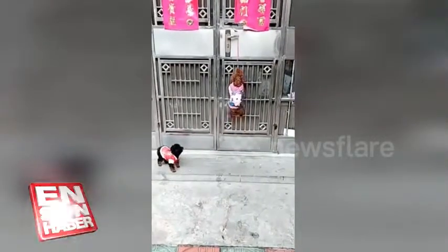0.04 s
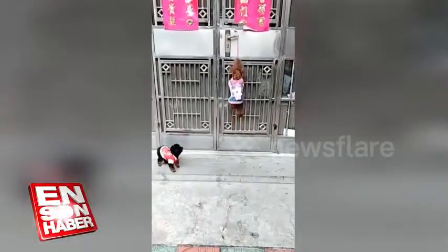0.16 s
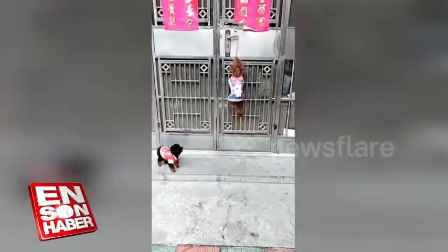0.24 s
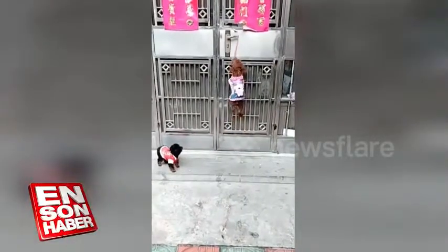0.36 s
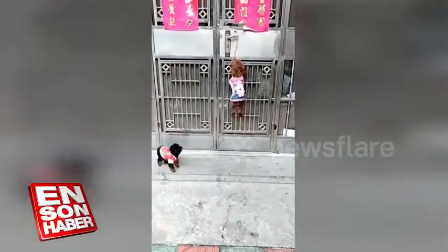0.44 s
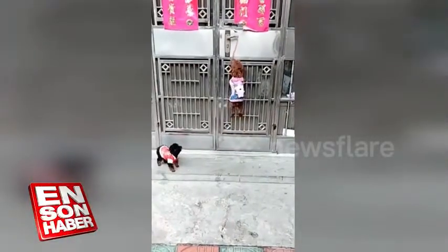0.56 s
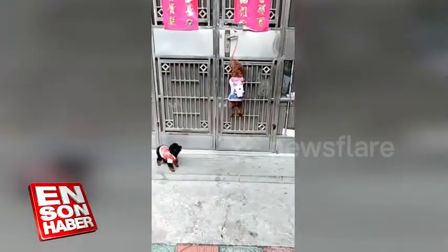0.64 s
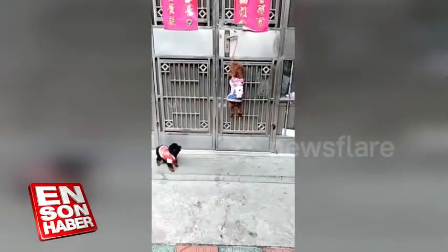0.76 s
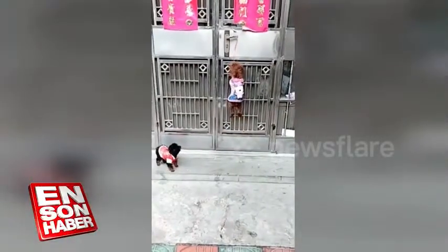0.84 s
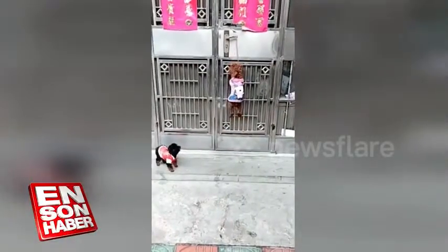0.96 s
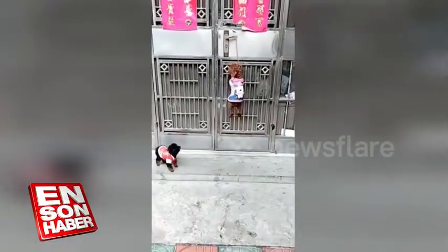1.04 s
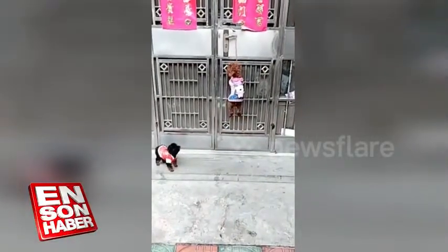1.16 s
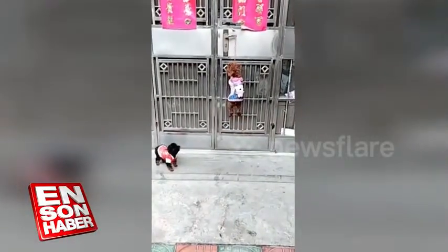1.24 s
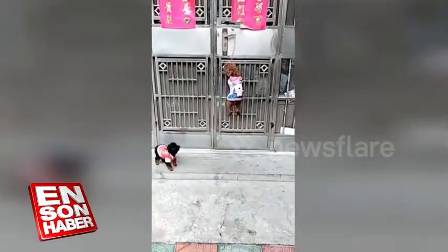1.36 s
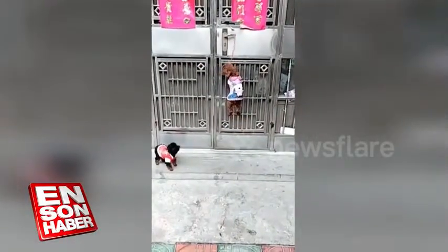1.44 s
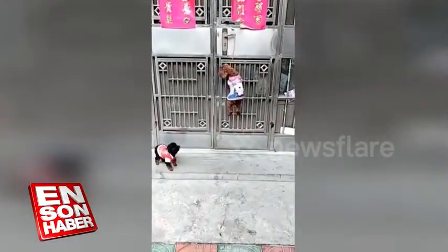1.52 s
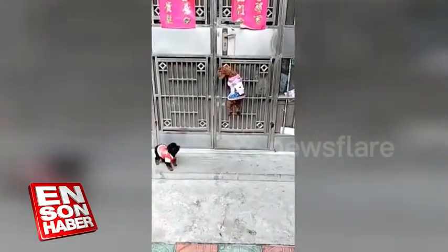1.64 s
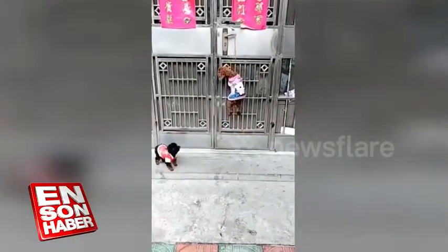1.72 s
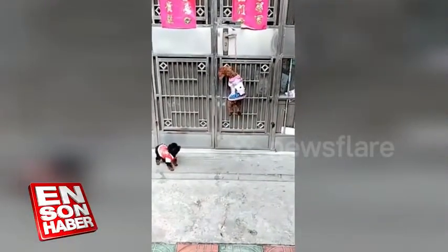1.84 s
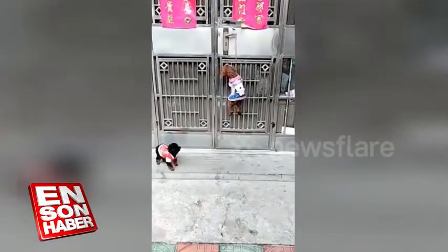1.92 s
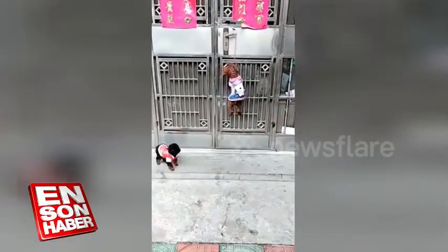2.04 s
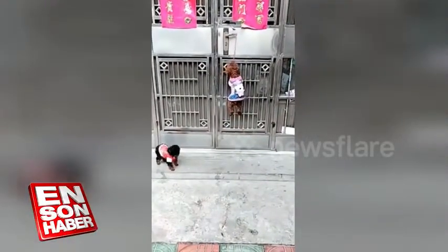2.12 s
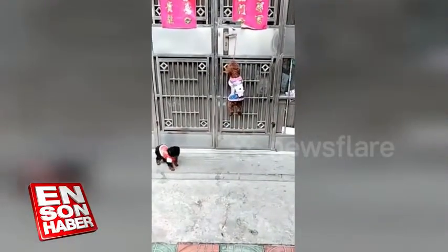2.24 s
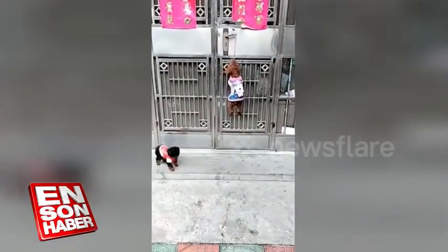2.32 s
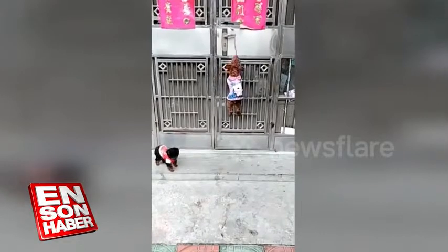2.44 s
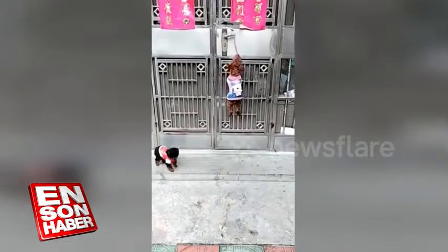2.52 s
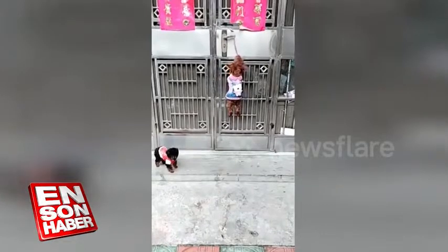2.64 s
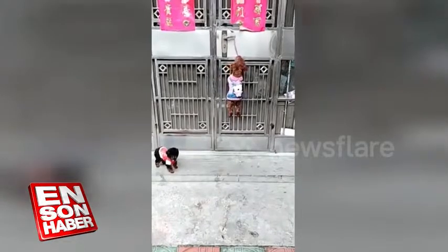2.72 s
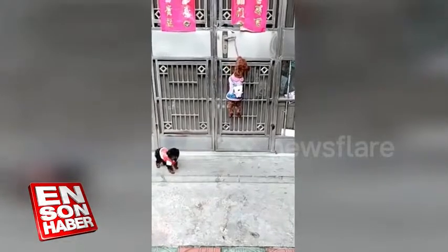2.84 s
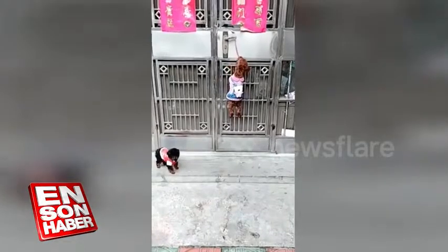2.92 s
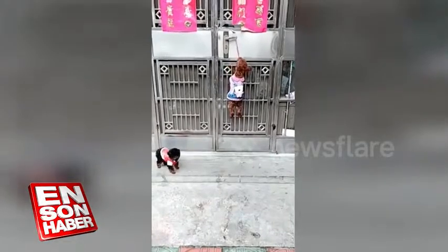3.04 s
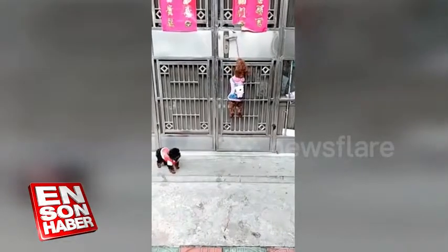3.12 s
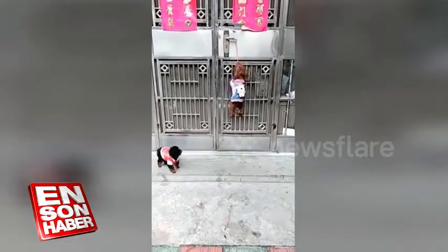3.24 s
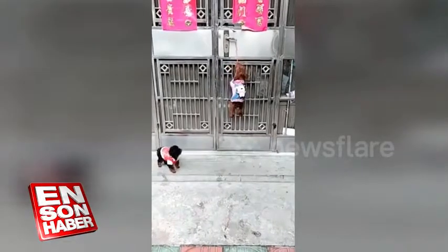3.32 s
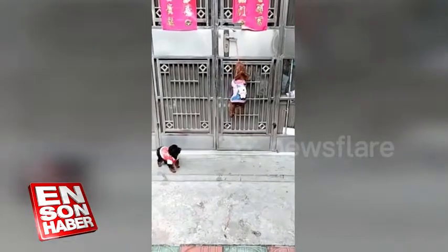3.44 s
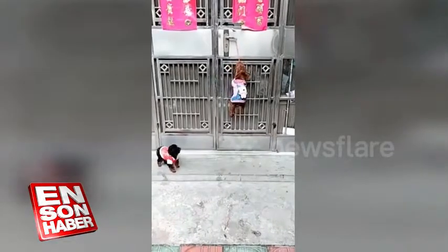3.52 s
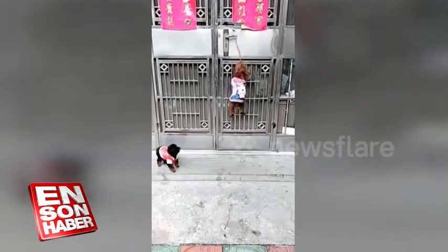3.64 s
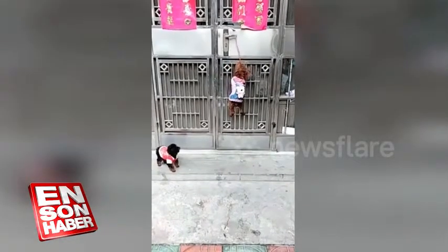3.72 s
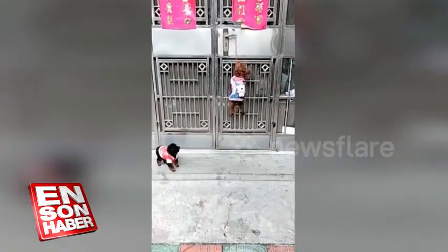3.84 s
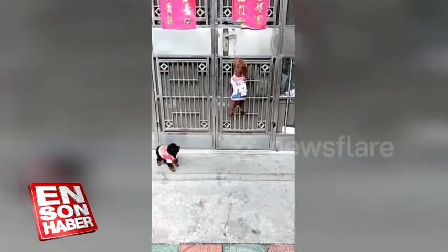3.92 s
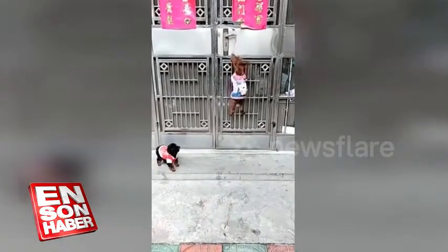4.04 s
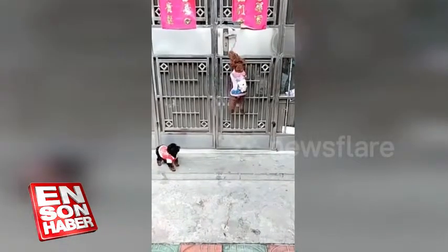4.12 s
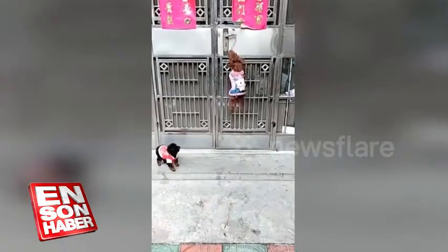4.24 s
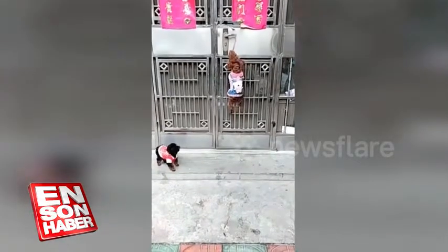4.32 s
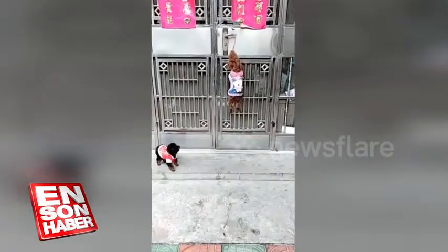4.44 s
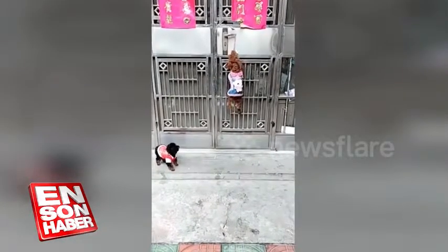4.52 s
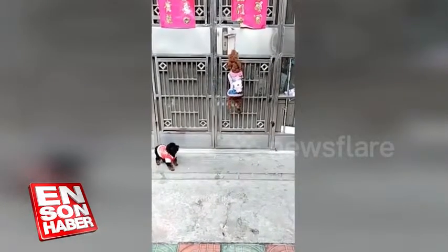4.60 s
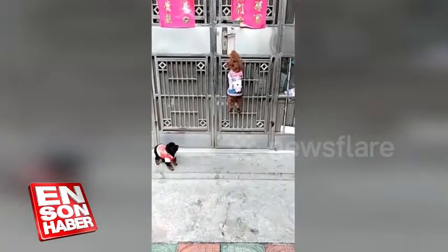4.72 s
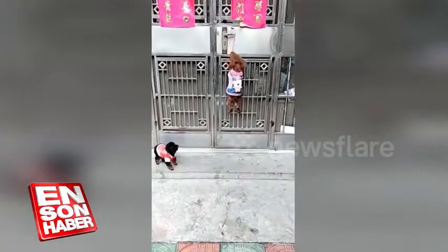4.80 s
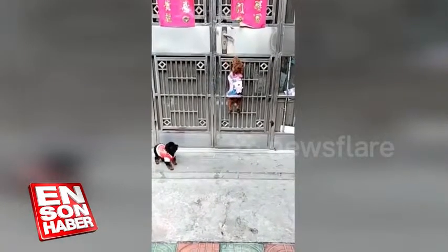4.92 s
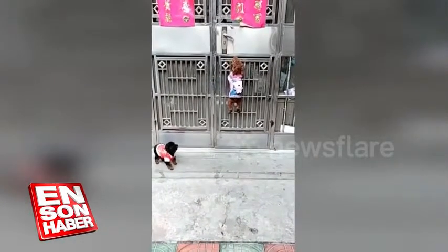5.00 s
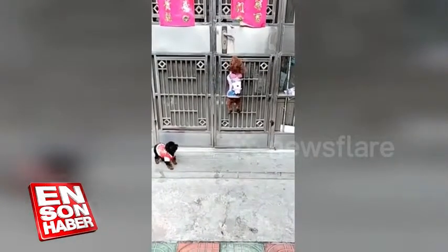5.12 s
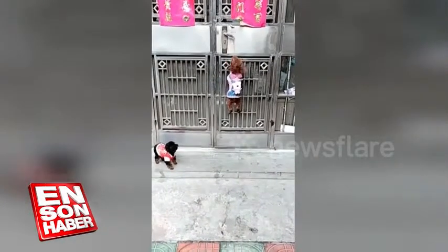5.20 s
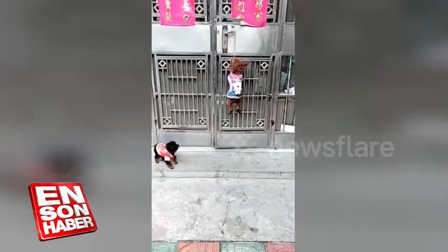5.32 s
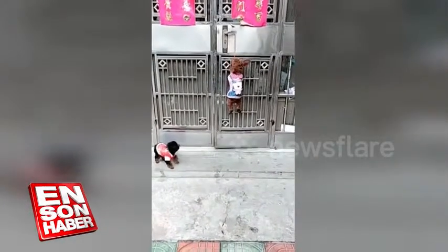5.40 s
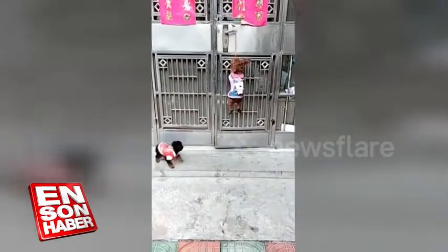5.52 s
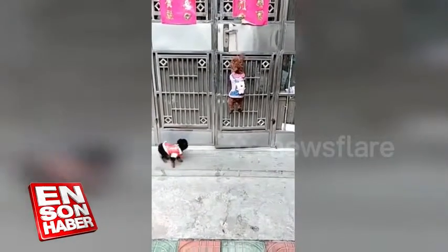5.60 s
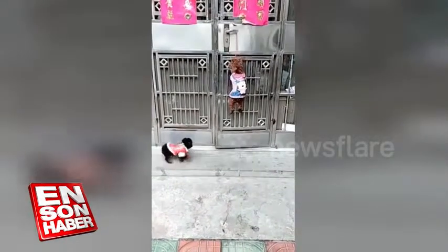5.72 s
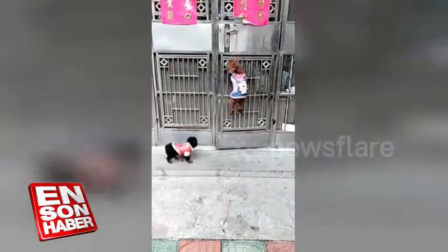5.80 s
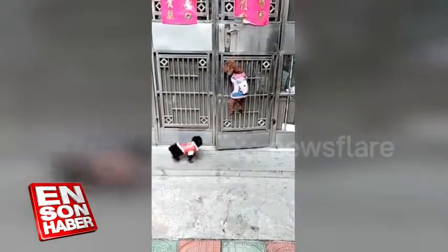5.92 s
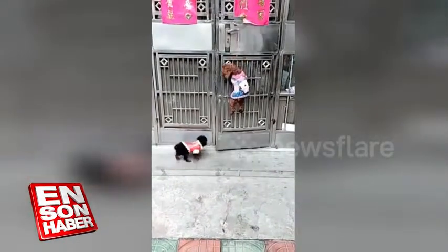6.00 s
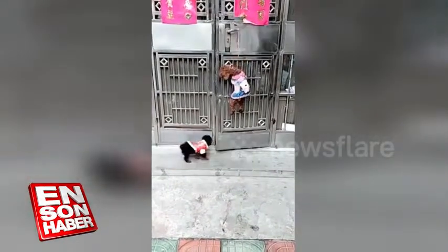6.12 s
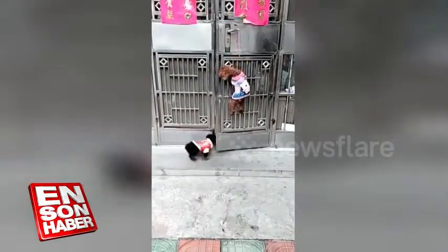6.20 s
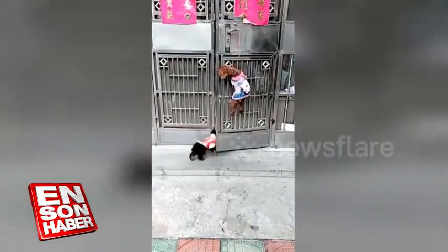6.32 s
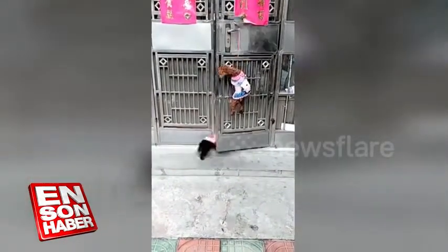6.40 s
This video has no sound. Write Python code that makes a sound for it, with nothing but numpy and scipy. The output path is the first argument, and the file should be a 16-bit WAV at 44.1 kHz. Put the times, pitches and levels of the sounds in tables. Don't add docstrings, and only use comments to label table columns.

```python
import sys
import numpy as np
from scipy import signal
from scipy.fft import rfft, irfft, next_fast_len
from scipy.io import wavfile
from scipy.ndimage import uniform_filter1d

SR = 44100
rng = np.random.default_rng(int(sys.argv[2]) if len(sys.argv) > 2 else 0)


def voltage_ratio(decibels):
    exponent = np.asarray(decibels, float) / 20
    return 10 ** exponent


def to_wav(s):
    ch = np.atleast_2d(s).T
    pcm = np.round(np.clip(ch, -1, 1) * 32767)
    wavfile.write(sys.argv[1], SR, pcm.astype(np.int16))


N = 284834
LAG_S = 0.001536


def unit(x):
    return x / np.sqrt(np.mean(x ** 2))


def band(x, hz, width):
    edge = np.sqrt(hz ** 2 + width ** 2 / 4)
    sos = signal.butter(2, [edge - width / 2, edge + width / 2], "band", fs=SR, output="sos")
    return signal.sosfilt(sos, x)


def colour(x, shape):
    hz, db = np.transpose(shape)
    size = next_fast_len(len(x))
    log_hz = np.log(np.arange(size // 2 + 1) * SR / size + 1)
    gain = voltage_ratio(np.interp(log_hz, np.log(hz), db))
    return irfft(rfft(x, size) * gain, size)[:len(x)]


def ring(x, hz, t60):
    r = np.exp(-np.log(1000) / (t60 * SR))
    w = 2 * np.pi * hz / SR
    return signal.lfilter([0, r * np.sin(w)], [1, -2 * r * np.cos(w), r * r], x + 1e-15)


def fade(x, t60):
    return signal.lfilter([1], [1, -np.exp(-np.log(1000) / (t60 * SR))], x + 1e-15)


def walk(rate):
    k = int(SR / rate)
    levels = np.repeat(rng.standard_normal(N // k + 1), k)
    return unit(uniform_filter1d(uniform_filter1d(levels, k), k)[:N])


def town():
    # pitch_hz, level_db [dB per Hz]
    town_colour = [(20, -13), (40, -8), (56, 2.5), (80, -9.5), (108, -3), (160, -14.5), (260, -15.5),
                   (500, -23), (1000, -25), (2000, -30.5), (3200, -31), (6300, -35.5), (12500, -40),
                   (15500, -56)]
    # time_s, level_db
    traffic_swell = [(0, 9), (.3, 4.5), (1.05, 1.6), (1.9, 2.1), (2.2, 4), (2.6, 3.5), (3.55, 4.5),
                     (4.35, 6.5), (4.85, 5), (5.35, 3.5), (6.05, 5.5), (6.46, 7.5)]
    s, mid_db = np.transpose(traffic_swell)
    t = np.arange(N) / SR
    noise = unit(colour(rng.standard_normal(N), town_colour))
    rumble = signal.sosfiltfilt(signal.butter(1, 160, fs=SR, output="sos"), noise)
    below = signal.sosfiltfilt(signal.butter(1, 1500, fs=SR, output="sos"), noise)
    middle = (below - rumble) * voltage_ratio(np.interp(t, s, mid_db) + 0.93 * walk(7.49))
    hiss = (noise - below) * voltage_ratio(np.interp(t, s, -2.02 + 0.3 * mid_db))
    return voltage_ratio(-65) * (rumble * voltage_ratio(1.44 * walk(3.35)) + middle + hiss)


def rub_levels():
    # start_s, length_s, bars_db, brightness_db, panel_db [over the bars]
    scrapes = [(0.0, 0.023, -61, -25, 8.5), (0.331, 0.145, -66, -7.5, -9), (0.496, 0.22, -63, -6, -13),
               (0.706, 0.083, -63, -10, -17), (0.833, 0.073, -70.5, -7, 5), (2.394, 0.058, -68, 4.5, -6),
               (2.597, 0.046, -76.5, -1, 13), (2.715, .04, -81, -22, 14), (2.892, 0.19, -66, -1, 0),
               (3.083, 0.15, -70.5, -1.5, -7), (3.272, 0.06, -63, -4.5, -4), (3.693, 0.07, -62, -4.5, 3.5),
               (4.103, 0.029, -85, 15.5, 9), (4.192, 0.06, -75, 0, -4), (4.707, 0.038, -70, -11, -5),
               (4.935, 0.044, -70.5, 3, -8), (5.228, 0.055, -69, -15, 1), (5.39, 0.11, -66.5, -6, -7),
               (5.673, 0.054, -57, -14, -12), (5.77, 0.03, -67.5, 2, 14), (6.299, 0.064, -67, -4.5, -9),
               (6.348, 0.1, -68, 8.5, -3)]
    # start_s, length_s, bars_db, brightness_db, thin_hiss_db [over the latch]
    slides = [
        (0.096, 0.14, -52.5, -5.5, -7),
        (0.203, 0.065, -51, 1, -10),
        (0.239, 0.089, -52.5, -9.5, -8),
        (3.75, 0.049, -55, -5.5, 2),
        (5.463, 0.15, -60, -7.5, 4.5),
        (5.577, 0.11, -58.5, -1, 0),
        (5.719, 0.021, -47.5, -16, 3),
        (5.731, 0.031, -49.5, -3, 7),
    ]
    grip_s, slip_off_s, slow_share = 0.014, 0.019, 0.14
    tip_db, slide_panel_db = -11.5, -6.5
    drags = [(*row, tip_db) for row in scrapes]
    drags += [(*row[:4], slide_panel_db, row[4]) for row in slides]
    out = np.zeros((4, N))
    t = np.arange(N) / SR
    for start, length, db, bright_db, panel_db, thin_db in drags:
        slow = slow_share * length
        grip = (t - start) / (grip_s + slow)
        slip_off = (start + length - t) / (slip_off_s + slow) + 0.5
        drag = np.clip(np.minimum(grip, slip_off), 0, 1) ** 2
        out += drag * voltage_ratio(db + np.array([[panel_db], [0], [bright_db], [bright_db + thin_db]]))
    return out


def claws(rate=3000, spread_db=2.5, stutter_db=1.5):
    size_db = spread_db * np.minimum(rng.exponential(size=N), 3)
    slips = (rng.random(N) < rate / SR) * rng.choice([-1, 1], N) * voltage_ratio(size_db)
    rough = unit(slips) + 0.37 * rng.standard_normal(N)
    return unit(rough * voltage_ratio(stutter_db * walk(50)))


def knocks():
    # start_s, body_db, latch_db,
    # pitch_hz [of the struck part]
    all_knocks = [(0.102, -41, -62, 640), (0.202, -39, -64, 1050), (0.266, -48.5, -72, 202),
                  (0.28, -45, -65, 1110), (0.317, -47, -57, 420), (0.368, -52, -71, 327),
                  (0.377, -51.5, -72, 250), (0.434, -55, -85, 850), (2.324, -50, -59, 1990),
                  (2.334, -28, -45, 2320), (2.336, -32, -52, 2770), (2.341, -32.5, -49, 2380),
                  (2.359, -51, -39, 2030), (2.366, -39.5, -56, 382), (5.743, -66, -62, 1070),
                  (5.759, -46, -60, 470), (5.769, -52, -70, 225), (5.808, -37, -33.5, 990),
                  (6.1286, -21, -20.5, 1200), (6.149, -52, -26, 524), (6.16, -43, -39, 325),
                  (6.165, -43, -42, 393), (6.202, -38.5, -59, 1070), (6.257, -46, -79, 1460),
                  (6.268, -44, -78, 700),
                  (2.633, -55.5, -74, 460), (2.72, -58.5, -84, 487), (3.002, -58.5, -46.5, 930),
            (3.015, -61, -67, 680), (3.054, -75, -64, 408), (3.095, -70, -58.5, 240),
            (3.116, -56, -67, 400), (3.151, -57, -72, 470), (3.31, -52.5, -76, 2240),
            (3.436, -52, -63, 654), (3.763, -52, -58.5, 1130), (3.891, -55, -53.5, 1800),
            (3.895, -59, -59.5, 1490), (3.98, -56, -74, 236), (4.012, -48.5, -63, 743),
            (4.022, -55, -63, 284), (4.036, -69, -74, 1500), (4.041, -49.5, -74, 540),
            (4.718, -61, -71, 1940), (4.944, -61, -69, 2300), (4.964, -63, -74, 685),
            (5.098, -65.5, -73, 350), (5.243, -65, -71, 231)]
    s, db, latch_db, hz = np.transpose(all_knocks)
    octaves = np.log2(hz / 560)
    panel_db = db - 4 * np.maximum(octaves, 0)
    bars_db = db + 4 * np.minimum(octaves, 0)
    return s, panel_db, bars_db, latch_db, db, hz


def blows(size):
    x = np.zeros(N)
    np.add.at(x, ((knocks()[0] + LAG_S) * SR).astype(int), size)
    return x


def part(modes, crowd, knock_db, rub, ring_db, rub_ring_db, rise_s, spot_db=3.0):
    # pitch_hz, level_db [dB per Hz]
    grit = [(2000, -23), (3000, -1), (4300, 2), (6500, -0.5), (8500, -4.5), (10500, -30)]
    hz, width, crowd_db, t60, rub_db = crowd
    spots = rng.standard_normal((len(knock_db), len(modes), 2))
    slips = claws()
    struck = 0
    for k, (f, db, t) in enumerate(modes):
        push_db = knock_db + db + ring_db + spot_db * spots[:, k, 0]
        hits = blows(np.sign(spots[:, k, 1]) * voltage_ratio(push_db))
        struck = struck + ring(hits, f, t) - ring(hits, f, rise_s)
    rubbed = unit(sum(voltage_ratio(db) * unit(ring(slips, f, 0.75 * t)) for f, db, t in modes))
    hiss = unit(colour(slips, grit) if hz > 4000 else band(slips, hz, width))
    crowd_hits = blows(voltage_ratio(knock_db + crowd_db))
    swell = fade(crowd_hits, t60) - fade(crowd_hits, rise_s)
    swarm = swell * unit(band(rng.standard_normal(N), hz, width))
    return struck + swarm + rub * (voltage_ratio(rub_db) * hiss + voltage_ratio(rub_ring_db) * rubbed)


def contact(thud_db=7, cycles=11, chatter_db=-4, crack_db=0.5, crack_s=0.0056, snap_db=16.5):
    # pitch_hz, level_db [dB per Hz]
    crack_colour = [(1470, -12), (2500, -0.5), (5140, 0), (6310, -5.5), (8230, 2.5), (12100, -21),
                    (14100, -28), (15300, -31)]
    out = np.zeros(N + SR)
    t = np.arange(SR // 8) / SR
    times, _, _, latch_db, body_db, pitch = knocks()
    for s, db, hz in zip(times, body_db, pitch):
        chatter = unit(band(rng.standard_normal(len(t)), hz, 1.09 * hz))
        rough = np.sin(2 * np.pi * hz * t) + voltage_ratio(chatter_db) * chatter
        swell = (1 - np.exp(-t * hz / 0.49)) * voltage_ratio(db + thud_db - 60 * t * hz / cycles)
        out[int((s + LAG_S) * SR):][:len(t)] += rough * swell
    sos = signal.butter(2, [3000, 10500], "band", fs=SR, output="sos")
    snap = signal.sosfilt(sos, blows(-voltage_ratio(latch_db + snap_db)))
    crack = fade(blows(voltage_ratio(latch_db + crack_db)), crack_s) * unit(colour(rng.standard_normal(N), crack_colour))
    return out[:N] + snap + crack


def pings(flutter_db=3.5):
    # start_s, pitch_hz, level_db, t60_s
    lone_tones = [(.104, 740, -39.5, 0.047), (.285, 1104, -39, 0.023), (.318, 266, -40, 0.095),
                  (2.325, 490, -35.5, 0.02), (2.335, 12870, -39, .055), (2.335, 11700, -49, 0.13),
                  (2.334, 10570, -44, .059), (2.335, 4980, -43, 0.068), (2.334, 3340, -36, 0.048),
                  (2.335, 2110, -37, .05), (2.3605, 560, -27.5, 0.012), (3.77, 464, -49.5, 0.046),
                  (4.013, 1266, -51.5, 0.044), (4.038, 950, -58, 0.026), (4.943, 5170, -60, 0.044),
                  (5.723, 1344, -43.5, 0.067), (5.733, 1130, -30.5, 0.026), (5.74, 1370, -43, 0.036),
                  (5.746, 10440, -47, 0.091), (5.749, 7000, -52, .089), (5.761, 454, -43.5, .04),
                  (5.811, 705, -38.5, 0.017), (6.135, 11940, -43, 0.16), (6.1295, 1068, -16, 0.026),
                  (6.131, 5900, -34, 0.066), (6.133, 397.5, -33, 0.18), (6.133, 527, -29.5, 0.067),
                  (6.257, 1136, -36, .06), (6.258, 725, -33.5, 0.011), (6.136, 1409, -29, 0.092)]
    # start_s, level_db
    sways = [
        (0.162, -48.5),
        (0.249, -41),
        (2.348, -49.5),
        (4.052, -57.5),
        (6.149, -52),
    ]
    booms = [(s, 109.8, db, 0.31) for s, db in sways]
    out = np.zeros(N + SR)
    t = np.arange(SR // 2) / SR
    shake = walk(300)[:N // len(t) * len(t)].reshape(-1, len(t))
    for k, (s, hz, db, t60) in enumerate(lone_tones + booms):
        rise_s = 0.0036 * (1000 / hz) ** 0.67
        swell = np.minimum(t / rise_s, 1) ** 2 * voltage_ratio(db - 60 * np.maximum(t - rise_s, 0) / t60)
        flutter = voltage_ratio(flutter_db * (hz > 1500) * shake[k % len(shake)])
        out[int(s * SR):][:len(t)] += swell * np.sin(2 * np.pi * hz * t) * flutter
    return out[:N]


def hums(stutter_db=2.5):
    # start_s, end_s, pitch_hz, width_hz, level_db
    held_tones = [(0.118, 0.19, 1383, 60, -57), (0.156, 0.22, 1100, 90, -54),
                  (0.27, 0.333, 1090, 90, -58.5), (0.125, 0.204, 760, 150, -57),
                  (0.187, 0.233, 1900, 60, -58.5), (0.205, .25, 4270, 80, -57.5),
                  (0.525, 0.71, 1660, 447, -69.5), (0.719, 0.795, 3000, 2500, -70),
                  (2, 2.316, 1540, 500, -78.5), (3.73, 3.798, 1137, 98, -61.5),
                  (3.263, 3.343, 2130, 700, -67), (5.471, 5.63, 1430, 79.6, -62),
                  (5.484, 5.7, 2150, 500, -64), (5.493, 5.664, 714, 60.5, -68.5),
                  (5.63, 5.7, 2500, 250, -63.5), (4.701, 4.742, 1890, 600, -66.5),
                  (4.94, 5.006, 2030, 700, -68.5), (5.245, 5.288, 1100, 300, -71)]
    out = np.zeros(N)
    slips = claws() * voltage_ratio(stutter_db * walk(29.85))
    for start, end, hz, width, db in held_tones:
        a, b = int(start * SR), int(end * SR)
        out[a:b] += voltage_ratio(db) * signal.windows.tukey(b - a, 0.4) * unit(band(slips[a:b], hz, width))
    return out


def gate():
    # pitch_hz, level_db, t60_s
    panel_modes = [(270.8, -5, 0.32), (332, -7, 0.45), (399.3, -1.5, 0.23), (468.6, 0.5, 0.15),
                   (536, -14, 0.26), (564, -6.5, 0.033), (634, -6.5, 0.36)]
    bar_modes = [(709, -9, 0.16), (840, -5, 0.028), (965, -5, 0.085), (1067, -11.5, 0.18),
                 (1109, -2.5, 0.12), (1212, -5.5, 0.042), (1357, -18, 0.16), (1407, 1, 0.12),
                 (1523, -0.5, 0.093), (1687, -1.5, 0.098), (1875, -3, 0.062), (2105, -11.5, 0.039),
                 (2250, -11, 0.26), (2500, -9, 0.068)]
    latch_modes = [(3340, 7, 0.086), (4150, 2.5, 0.13), (5300, -9, .13), (6700, -9, 0.11), (5900, -4, 0.08),
                   (7000, 6, 0.075), (8050, -2, 0.083), (8300, 0, 0.1), (9300, -1, 0.04)]
    # centre_hz, width_hz, knock_db, t60_s, scrape_db
    crowds = [
        (417, 610, -13, 0.19, -16.5),
        (1486, 2100, -20, 0.19, -5),
        (5950, 10700, -14, 0.064, -2.5),
    ]
    _, panel_db, bars_db, latch_db, _, _ = knocks()
    rub = rub_levels()
    panel = part(panel_modes, crowds[0], panel_db, rub[0], ring_db=-15, rub_ring_db=-4, rise_s=0.0029)
    bars = part(bar_modes, crowds[1], bars_db, rub[1], ring_db=-16.5, rub_ring_db=-6.0, rise_s=0.003)
    latch = part(latch_modes, crowds[2], latch_db, rub[2], ring_db=-27.5, rub_ring_db=-16, rise_s=0.0098)
    claw_tips = rub[3] * unit(band(claws(), 9250, 6300))
    return panel + bars + latch + claw_tips + contact() + pings() + hums()


def lane(x):
    level_db, t60_s, dull_above_hz = -19.5, 0.39, 3250
    t = np.arange(SR // 2) / SR
    tail = rng.standard_normal(len(t)) * voltage_ratio(-60 * t / t60_s) * np.clip(t / 0.023, 0, 1)
    tail = signal.lfilter(*signal.butter(1, dull_above_hz, fs=SR), tail)
    return voltage_ratio(level_db) * signal.fftconvolve(x, tail / np.sqrt(np.sum(tail ** 2)))[:N]


def scene():
    steel = gate()
    return (steel + lane(steel) + town())[None]


def low_pass(x):
    return signal.sosfilt(signal.butter(12, 15490, fs=SR, output="sos"), x)


def record(dry):
    heard = signal.sosfilt(signal.butter(6, 13800, fs=SR, output="sos"), dry)
    return low_pass(heard)


dry = scene()
out = record(dry)
to_wav(out)
```